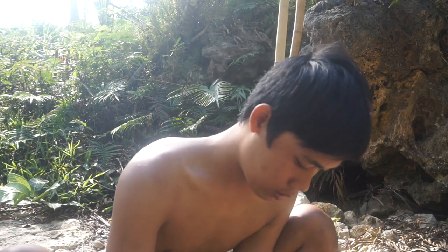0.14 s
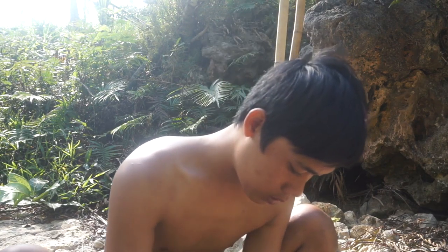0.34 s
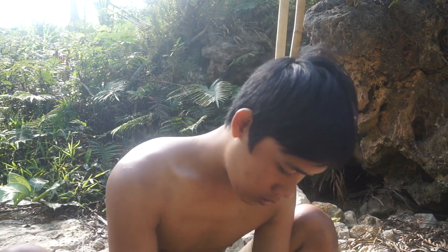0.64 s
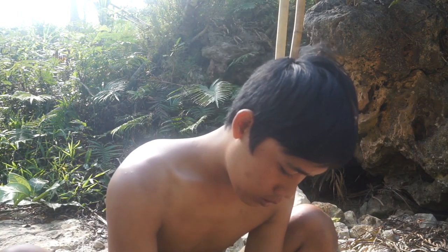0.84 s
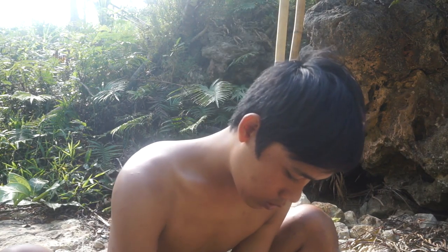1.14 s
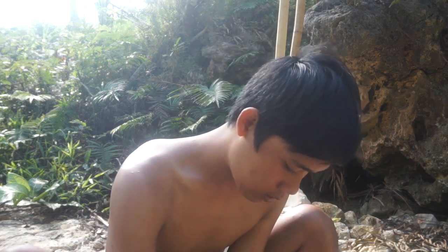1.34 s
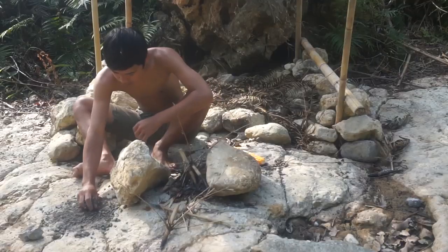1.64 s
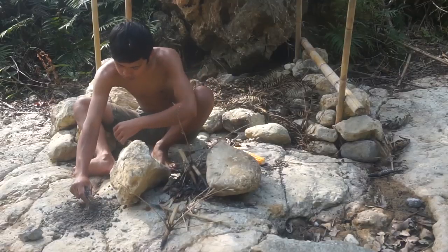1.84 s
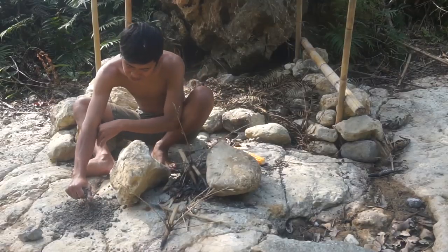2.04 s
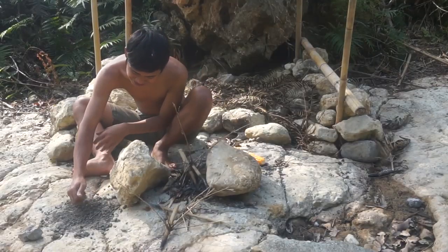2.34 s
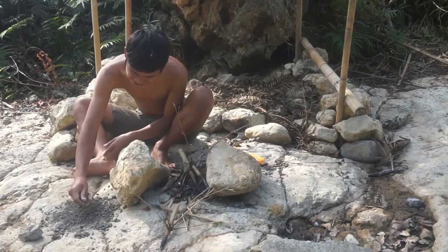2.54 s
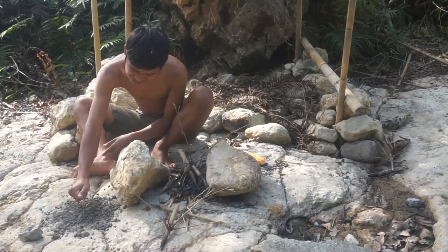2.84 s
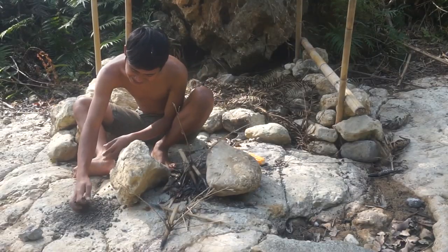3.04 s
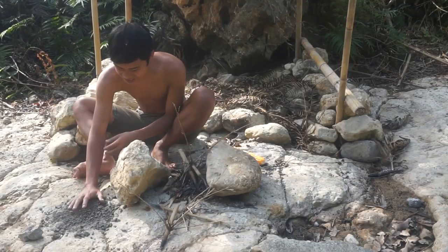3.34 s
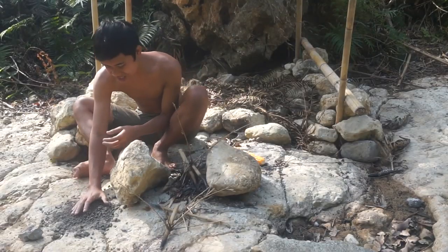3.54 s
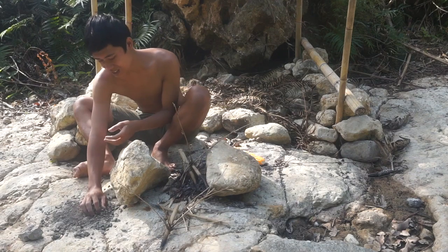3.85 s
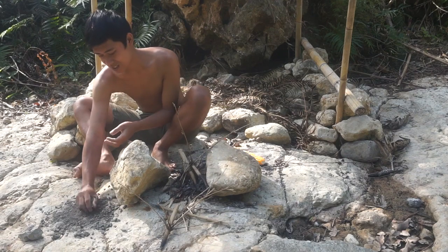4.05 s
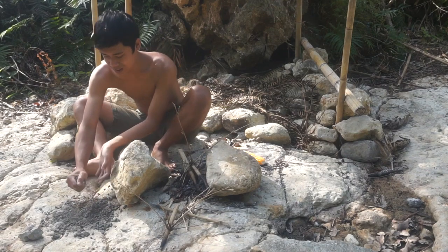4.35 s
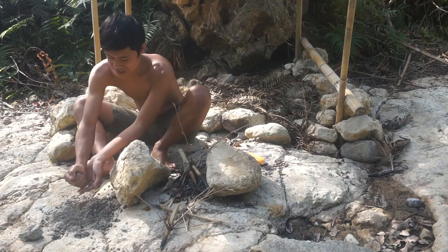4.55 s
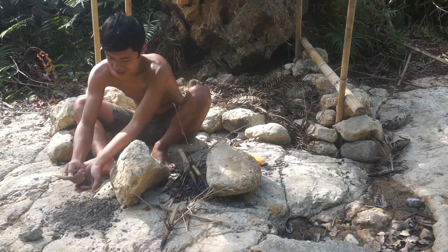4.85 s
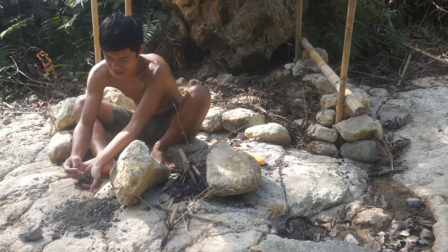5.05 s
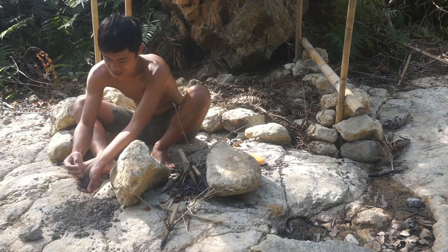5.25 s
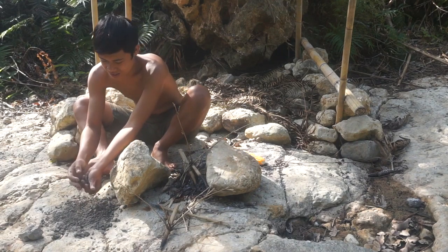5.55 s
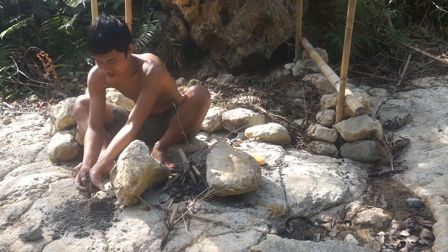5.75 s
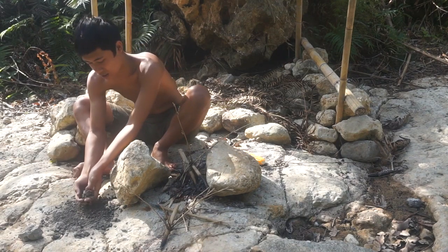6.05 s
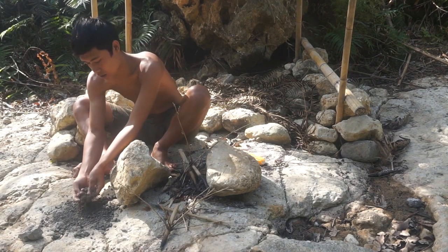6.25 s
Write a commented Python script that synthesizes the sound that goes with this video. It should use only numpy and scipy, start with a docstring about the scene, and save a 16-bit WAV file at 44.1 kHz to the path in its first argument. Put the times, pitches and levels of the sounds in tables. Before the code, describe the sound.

A hand-held stone pounds gritty crumbs on a rock slab in a steady rhythm, then stops, leaving faint rubbing and a high insect buzz.

```python
"""Pounding stone in a forest

A hand-held stone pounds dark crumbs to powder on a rock slab, three blows a second: each impact excites
heavily damped modes, a dry knock wrapped in crunching grit. Cicada tymbals buzz, a cricket's wings pulse
and drips ring small bubbles. The level dips after the hard third blow. Once the pounding stops, fingers
rub the powder and the forest hiss stands out, with a faint far drone under it."""
import sys
import numpy as np
from scipy import signal
from scipy.fft import rfft, irfft, next_fast_len
from scipy.io import wavfile
from scipy.ndimage import uniform_filter1d, map_coordinates

SR = 44100
rng = np.random.default_rng(int(sys.argv[2]) if len(sys.argv) > 2 else 0)


def wav_record(signal):
    """Record a signal, one row per channel, as 16-bit PCM in the file named by sys.argv[1]."""
    frames = np.transpose(np.atleast_2d(signal))
    bounded = np.clip(frames, -1, 1)
    # unit amplitude maps onto the largest positive 16-bit level
    quanta = np.round(bounded * 32767).astype(np.int16)
    wavfile.write(sys.argv[1], SR, quanta)


N = 282664
REST_S = 3.82  # the pounding ends


def amp(db):
    """Amplitude ratio for a level in decibels."""
    return 10 ** (np.asarray(db) / 20)


def unit(x):
    """Normalisation to rms 1."""
    return x / np.sqrt(np.mean(x ** 2) + 1e-20)


def along(points, hz):
    """Interpolation of (f/Hz, value) points on a logarithmic frequency axis."""
    f, values = np.transpose(points)
    return np.interp(np.log(hz + 1), np.log(f + 1), values)


def wobble(rate):
    """Smooth random modulation: a spline through rate knots a second."""
    return map_coordinates(rng.standard_normal(int(N * rate / SR) + 4), [np.arange(N) * rate / SR])


def swell(s, half_s):
    """Gaussian envelope of height 1, centred on time s."""
    return np.exp(-((np.arange(N) / SR - s) / half_s) ** 2)


def at_rest(fade_s=0.19):
    """Linear ramp from 0 during the pounding to 1 after it."""
    return np.clip((np.arange(N) / SR - REST_S) / fade_s, 0, 1)


def filtered(x, response):
    """Linear filtering: the spectrum of x times a complex frequency response."""
    n = x.shape[-1]
    padded = next_fast_len(n + SR // 10)
    return irfft(rfft(x, padded) * response(np.fft.rfftfreq(padded, 1 / SR)), padded)[..., :n]


def resonance(f, hz, q):
    """Frequency response of a damped harmonic oscillator."""
    return 1j * f * hz / q / (hz * hz - f * f + 1j * f * hz / q)


def add(track, s, sound):
    """Superposition of a stereo sound on the track at time s."""
    part = track[:, max(round(s * SR), 0):][:, :sound.shape[-1]]
    part += sound[..., :part.shape[-1]]


def rush(spectrum, patchy_db):
    """Partially coherent stereo noise of rms 1, its gain patchy in time and frequency."""
    # Left-right likeness of the forest air: f/Hz, coherence
    coherence = [(60, 0.68), (170, 0.53), (500, -0.35), (1430, -0.3), (4110, 0.069), (11800, 0.52)]
    spectra = signal.stft(rng.standard_normal((2, N)), nperseg=512)[2]
    patches = uniform_filter1d(rng.standard_normal(spectra.shape[1:]), size=6, axis=0)
    patches = uniform_filter1d(patches, size=14, axis=1)
    pair = signal.istft(spectra * amp(patchy_db * unit(patches)), nperseg=512)[1][:, :N]
    angle = lambda f: np.arccos(np.clip(along(coherence, f), -1, 1)) / 2
    mid, side = filtered(pair, lambda f: amp(along(spectrum, f)) * [np.cos(angle(f)), np.sin(angle(f))])
    return unit(np.array([mid + side, mid - side]))


def forest(rustle_db=-56.5, hiss_db=-61.5, stir_db=.7):
    """Broadband noise: leaves rustle below a fine, even hiss."""
    # Spectrum of the leaves: f/Hz, relative spectral level/dB
    rustle_spectrum = [(30, -31), (60, -30), (90, -19), (130, -16), (200, -9), (300, -5.5), (420, -1.5),
                       (520, 1.5), (1500, 0), (2100, -4), (3000, -8), (4200, -16.5), (7000, -40)]
    # Spectrum of the hiss: f/Hz, relative spectral level/dB
    hiss_spectrum = [(1200, -17.5), (2200, 0.5), (3200, 4), (4200, 3.5), (5200, 3), (8800, -0.5),
                     (9500, -1), (10900, -1), (12000, -30)]
    rustle = amp(rustle_db + stir_db * wobble(17)) * rush(rustle_spectrum, patchy_db=0.82)
    return rustle + amp(hiss_db) * rush(hiss_spectrum, patchy_db=2.2)


def buzz(hz, width_hz):
    """Narrow-band noise: dense tymbal clicks blur into a band around a pitch curve."""
    lowpass = lambda f: 1 / (1 + (f / width_hz) ** 4) ** .5
    in_phase, quadrature = filtered(rng.standard_normal((2, 2, len(hz))), lowpass)
    phase = 2 * np.pi * np.cumsum(hz) / SR
    return unit(in_phase * np.cos(phase) + quadrature * np.sin(phase))


def cicadas(tymbal_hz=70.5, fall_hz=340, pulse_depth=.55, climb_hz_per_db=14):
    """Tymbal beats modulate amplitude and frequency; a call swells and climbs with the insect's effort."""
    # Far, unbroken chorus: f/Hz, level/dB, half width/Hz
    chorus = [(8020, -67, 140), (7350, -72, 540)]
    # Single calls: t/s, duration/s, top f/Hz, top level/dB, half width/Hz
    calls = [(0.202, 0.67, 8160, -57.5, 100), (1.06, .2, 8120, -57.5, 90), (1.897, 0.96, 8190, -56.5, 99),
             (2.499, 0.57, 7000, -58, 150), (3.221, 0.67, 8030, -58, 80), (3.852, 0.58, 7350, -68, 170),
             (4.349, 1.38, 7950, -64.5, 110), (4.753, 0.98, 7600, -62.5, 210), (5.95, 0.41, 7350, -63, 120)]
    attack_s, release_s, swell_db, flutter_db = 0.059, .14, 9, 0.6
    out = sum(amp(db) * buzz(np.full(N, hz), width_hz) for hz, db, width_hz in chorus)
    for s, length, hz, db, width_hz in calls:
        t = np.arange(round((length + release_s) * SR)) / SR
        effort_db = -swell_db * np.maximum(1 - t / length, 0) ** 2
        gate = np.clip(np.minimum(t / attack_s, 1 - (t - length) / release_s), 0, 1)
        beat = (t * tymbal_hz) % 1
        pulses = unit(1 - pulse_depth * np.cos(2 * np.pi * beat))
        pitch = hz + climb_hz_per_db * effort_db + fall_hz * (.5 - beat)
        gain = amp(db + effort_db + flutter_db * wobble(25)[:len(t)])
        add(out, s, gain * gate * pulses * buzz(pitch, width_hz))
    return out


def cricket(strokes_per_s=12.95, top_hz=6830, fall_hz=270, blur_hz=30, db=-59.5, fade_db_per_s=0.94):
    """Stridulation: each wing stroke is a falling note, which foliage scatters into a steady ring."""
    t = np.arange(N) / SR
    cycle = ((t - .04) * strokes_per_s) % 1
    stroke = np.sin(np.pi * np.clip(cycle / 0.87, 0, 1)) ** 2
    hz = top_hz - fall_hz * cycle + blur_hz * np.array([wobble(300), wobble(300)])
    vigour = amp(1.5 * wobble(10))
    note = unit(stroke * vigour * np.sin(2 * np.pi * np.cumsum(hz, axis=1) / SR))
    ring = unit(filtered(rng.standard_normal((2, N)), lambda f: resonance(f, hz=6695, q=55) ** 2))
    echo_share = np.minimum(.02 + .13 * t, .7)
    return amp(db - fade_db_per_s * t) * (np.sqrt(1 - echo_share) * note + np.sqrt(echo_share) * ring)


def drips(rise=0.126, attack_s=0.0011):
    """Bubble resonance: each drop rings a small bubble whose pitch climbs, blurred by its splash."""
    # Water drops: t/s, starting f/Hz, level/dB, T60/s
    drops = [(0.036, 1486, -47.5, 0.078), (0.436, 1395, -47.5, 0.1), (.538, 1500, -48.5, 0.055),
             (4.051, 1587, -54, 0.18), (5.169, 1430, -55, 0.12), (5.523, 1433, -51.5, 0.16),
             (5.64, 1040, -51.5, 0.17), (5.718, 1150, -45.5, 0.089)]
    out, t = np.zeros((2, N)), np.arange(SR // 5) / SR
    for s, hz, db, t60 in drops:
        bubble = np.sin(2 * np.pi * hz * (t + rise * t * t / t60))
        splash = unit(filtered(rng.standard_normal((2, len(t))), lambda f: resonance(f, hz, q=7.7) ** 2))
        envelope = amp(db - 60 * t / t60) * (1 - np.exp(-t / attack_s))
        add(out, s, envelope * (0.85 * bubble + 1.1 * splash))
    return out


def crackle(envelope, apart):
    """Impulsive noise of energy 1 under an envelope; apart weights what differs between the ears."""
    shape = (3, len(envelope))
    spikes = rng.standard_normal(shape) * amp(3.1 * rng.standard_normal(shape))
    pair = (spikes[0] + apart * spikes[1:]) * envelope
    return pair / np.sqrt(np.sum(pair ** 2) / 2)


def slab_radiation(f, notch_hz, notch_q=5.5, notch_depth=.8):
    """Antiresonances of the slab: constant notches and one set by where and how the stone lands."""
    # Bands of weak radiation: f/Hz, Q, depth (0-1)
    hollows = [(1800, 5.7, 0.7), (2650, 33, 0.7)]
    notches = hollows + [(notch_hz, notch_q, notch_depth)]
    return np.prod([1 - depth * resonance(f, hz, q) for hz, q, depth in notches], axis=0)


def pounding(lead_s=.006, crush_t60=0.017, crunch_t60=0.023, spray_t60=0.13):
    """Impact excitation: the stone crushes crumbs and meets the slab; hand and ground damp the modes."""
    # Blows: t/s, knock level/dB; thud, clack, grit level/dB re knock; thud, knock, clack, notch f/Hz;
    # level/dB of the crunch after contact and of the crushing before it
    blows = [(0.2612, -25.5, -4.5, -6, -13.5, 624, 880, 1800, 1700, -9, 2.5),
             (0.5862, -29, -5, -5.5, -10.5, 675, 946, 1470, 365, 1.5, 10.5),
             (0.9055, -20.5, -20.5, -2, -14.5, 330, 1138, 1456, 550.4, -7.5, -22.5),
             (1.293, -39, -2.5, 4, 5, 348, 910, 1920, 563, 4, -1.5),
             (1.6023, -27, -3.5, -5.5, -6, 485, 896, 2020, 740, 0, -2.5),
             (1.9245, -23.5, -14.5, 0.5, -4.5, 293, 1170, 1990, 399, 5.5, -5.5),
             (2.2421, -21.5, -11.5, -1, -12.5, 456, 1020, 1620, 577, 5.5, -25),
             (2.5717, -24, -7.5, 0, -6.5, 445, 1200, 1360, 680, 0.5, -20),
             (2.8924, -25.5, -10.5, -0.5, -4, 398, 1040, 1590, 403, -4.5, -20),
             (3.1973, -30, -6.5, 7, -0.5, 402, 850, 1800, 367, 1.5, -25),
             (3.5103, -21, -12, -4, -13, 410, 934, 1610, 530, -6, -35),
             (3.5252, -41, -4, -12.5, -18, 450, 910, 1677, 500, 6, -23),
             (3.8318, -19.5, -7.5, -7, -9.5, 550, 900, 1400, 600, -10.5, 0.5)]
    # Spectrum of the grit: f/Hz, relative spectral level/dB
    grit_spectrum = [(1800, -32.5), (2900, -4), (3500, -7.5), (4200, -3.5), (5000, -8), (7000, -6),
                     (10500, -14), (12500, -9)]
    spray_db, push_db, crack_db, rms_span_s = -23, -30, -12, .02
    out = np.zeros((2, N))
    t = (np.arange(SR // 12) - round(lead_s * SR)) / SR
    approach = (t < 0) * amp(-60 * abs(t) / crush_t60)
    contact = (t == 0) * 1.
    settle = (t > 0) * amp(-60 * abs(t) / crunch_t60)
    spray = settle + (t > 0) * amp(spray_db - 60 * abs(t) / spray_t60)  # fine powder flies on
    for s, knock_db, thud_db, clack_db, grit_db, *timbre in blows:
        thud_hz, knock_hz, clack_hz, notch_hz, crunch_db, crush_db = timbre

        def ring(body, after_db, before_db, apart, tail=settle):
            """Forced response of a body to one hard contact between two spells of crumbling."""
            crunch = amp(crunch_db + after_db) * crackle(tail, apart)
            crush = amp(crush_db + before_db) * crackle(approach, apart)
            force = contact + crunch + crush
            return unit(filtered(force, lambda f: body(f) * slab_radiation(f, notch_hz)))

        push = lambda f: amp(push_db) * resonance(f, hz=91.4, q=0.43)
        thud_modes = lambda f: resonance(f, 0.53 * thud_hz, q=0.99) * resonance(f, thud_hz, q=2.46)
        clack_modes = lambda f: (resonance(f, clack_hz, q=2.5) * resonance(f, clack_hz, q=1)
                                 * resonance(f, hz=2305, q=1))
        stone_mode = lambda f: resonance(f, hz=3230, q=3) ** 2
        # crumbling is fine-grained, so it feeds the high parts more than the low ones
        thud = ring(lambda f: thud_modes(f) + push(f), after_db=-2, before_db=-13, apart=.5)
        knock = ring(lambda f: resonance(f, knock_hz, q=1.36) ** 2,
                     after_db=-1.5, before_db=-7, apart=0.35)
        clack = ring(clack_modes, after_db=2, before_db=-2.5, apart=0.63)
        crack = ring(stone_mode, after_db=1.5, before_db=-2, apart=1)
        grit = ring(lambda f: amp(along(grit_spectrum, f)), after_db=5, before_db=3, apart=1.7, tail=spray)
        blow = knock + amp(thud_db) * thud + amp(grit_db) * grit
        blow += amp(clack_db) * (clack + amp(crack_db) * crack)
        blow *= amp(knock_db) * np.sqrt(rms_span_s * SR / len(t))
        pan_db = np.interp(s, [0, 2.27], [3.2, -.5])  # from the left to the middle
        add(out, s - lead_s, blow * amp([[pan_db / 2], [-pan_db / 2]]))
    return out


def off_axis(x):
    """Phase difference: the slab lies to one side, so its sound reaches two microphones out of step."""
    # Lead of the left channel: f/Hz, phase/rad
    left_lead = [(100, -2.1), (400, 0.77), (650, 0.73), (1100, -1.2), (1500, 0.77), (2500, -1.3),
                 (4000, 0.45)]
    return filtered(x, lambda f: np.exp(1j * along(left_lead, f) * np.array([[.5], [-.5]])))


def overhang(x):
    """Reverberation from a rock overhang and trees: a short tail, drawn anew every third of a second."""
    # Reverberation time: f/Hz, T60/s
    decay_times = [(200, 0.16), (1500, 0.27), (4000, 0.33), (10000, 0.13)]
    out, size = np.zeros((2, N)), SR // 3
    for start in range(0, round(REST_S * SR), size):
        hz, t, spectra = signal.stft(rng.standard_normal((2, size)), SR, nperseg=256)
        decay = amp(-60 * t / along(decay_times, hz)[:, None])
        tail = signal.istft(spectra * decay, SR, nperseg=256)[1]
        tail /= np.linalg.norm(tail[0])
        add(out, start / SR, signal.fftconvolve(x[:, start:start + size], tail, axes=1))
    return out


def clicks_and_pings(click_t60=0.0022):
    """Transients: each is a sharp click and an exponentially decaying burst of band-limited noise."""
    # The rows at 0.9045 s and 3.83 s are brief, shrill pings at insect pitch on the two hardest blows;
    # the rest are loose crumbs shifting: t/s, f/Hz, level/dB, T60/s, click level/dB
    transients = [(.372, 3130, -52.5, .072, -55), (.9045, 6750, -27, .016, -42),
                  (1.972, 3970, -49, 0.14, -50), (2.272, 1690, -46, 0.059, -46),
                  (2.597, 424, -44.5, 0.1, -50), (3.229, 6650, -54, 0.2, -44),
                  (3.830, 8100, -21.5, 0.017, -37), (3.852, 420, -46, 0.093, -47.5),
                  (4.8396, 3950, -43.5, 0.026, -37), (4.870, 2730, -47, 0.039, -31),
                  (4.886, 2700, -49.5, 0.055, -33), (4.962, 2100, -54, 0.11, -51),
                  (5.105, 9000, -54, .032, -46)]
    out, t = np.zeros((2, N)), np.arange(SR // 5) / SR
    for s, hz, db, t60, click_db in transients:
        noise = crackle(np.ones(len(t)), apart=0.65)
        band = unit(filtered(noise, lambda f: resonance(f, hz, q=4) ** 2))
        click = crackle(amp(-60 * t / click_t60), apart=0.61)
        add(out, s, amp(db - 60 * t / t60) * band + amp(click_db) * click)
    return out


def dip(start_s=.908, attack_s=.012, hold_s=0.14, recovery_s=0.54):
    """Gain envelope: the level drops, holds, recovers exponentially in part, and opens up at rest."""
    dip_db, recovered_db, rest_db = -13.5, -3, 1.2
    t = np.arange(N) / SR - start_s
    held = np.exp(-np.maximum(t - hold_s, 0) / recovery_s)
    db = np.clip(t / attack_s, 0, 1) * (recovered_db + (dip_db - recovered_db) * held)
    return amp(db + (rest_db - db) * at_rest())


def rubbing(light_db=-66.5):
    """Friction noise: after the pounding, dry grains slip between the fingers in a soft rustle."""
    # Firmer strokes: t/s, half duration/s, level/dB re light rubbing
    strokes = [(4.06, 0.12, 4.4), (5.12, 0.1, 5.8)]
    slips = crackle(amp(2.5 * wobble(30)), apart=1.8)
    grains = filtered(slips, lambda f: resonance(f, hz=2200, q=1.57) ** 2)
    firm_db = sum(db * swell(s, half_s) for s, half_s, db in strokes)
    return at_rest() * amp(light_db + firm_db) * unit(grains)


def drone(upper_hz=155, lower_hz=134, upper_db=-81.5, lower_db=-83, swell_db=8, waver_hz=1.48):
    """Two far, low tones with slight frequency modulation, heard at rest; the upper one swells once."""
    tone = lambda hz: unit(np.sin(2 * np.pi * np.cumsum(hz + waver_hz * wobble(1.6)) / SR))
    upper = amp(upper_db + swell_db * swell(s=4.4, half_s=0.35)) * tone(upper_hz)
    return at_rest() * (upper + amp(lower_db) * tone(lower_hz))


def scene():
    """Superposition of the work close by and the forest all around, under one gain envelope."""
    blows = off_axis(pounding())
    reverberation = amp(-23) * overhang(blows)
    ambience = (cicadas() + cricket() + forest()) * amp([[.4], [-.4]])
    return dip() * (blows + reverberation + ambience + clicks_and_pings() + rubbing() + drips() + drone())


def record(dry, ceiling=.93, cutoff_hz=11200):
    """Soft saturation rounds off the highest peaks; a steep low-pass limits the bandwidth."""
    rounded = dry / (1 + (dry / ceiling) ** 8) ** (1 / 8)
    return filtered(rounded, lambda f: 1 / (1 + (f / cutoff_hz) ** 70))


dry = scene()
out = record(dry)
wav_record(out)
```